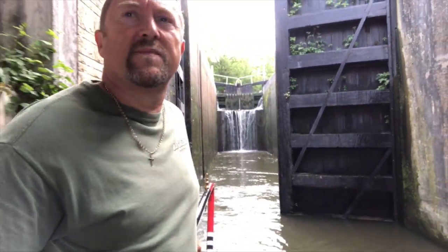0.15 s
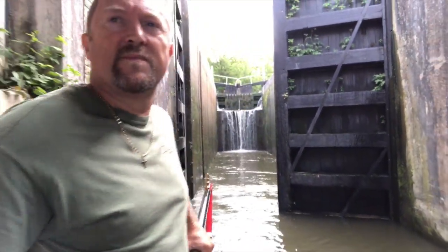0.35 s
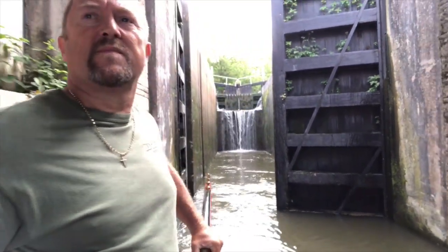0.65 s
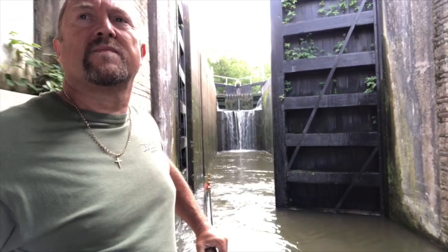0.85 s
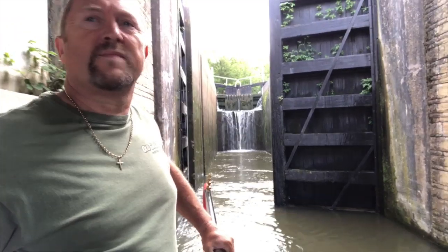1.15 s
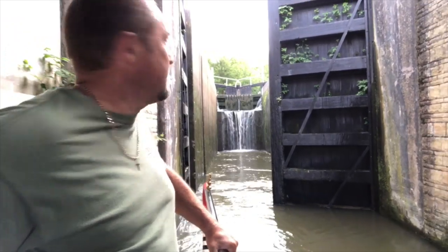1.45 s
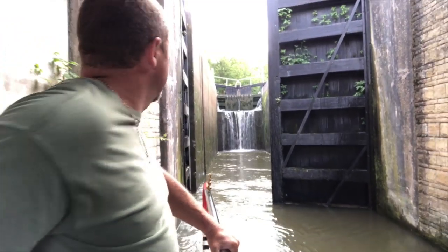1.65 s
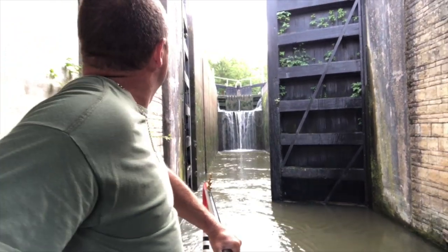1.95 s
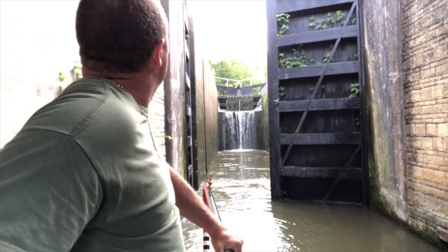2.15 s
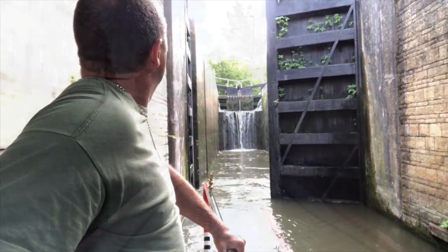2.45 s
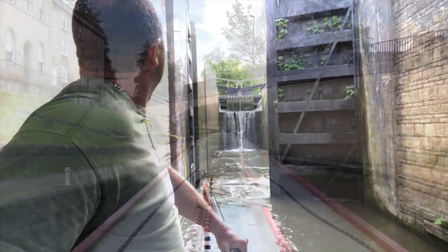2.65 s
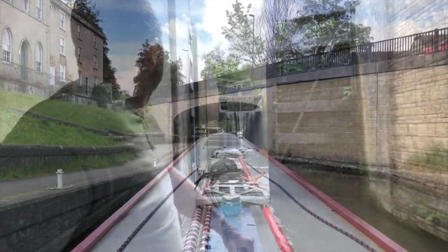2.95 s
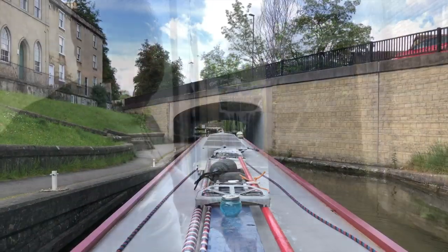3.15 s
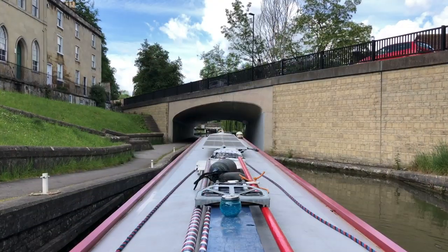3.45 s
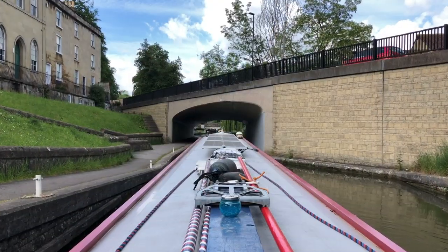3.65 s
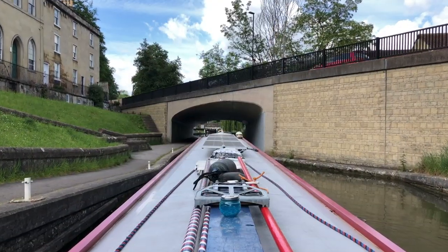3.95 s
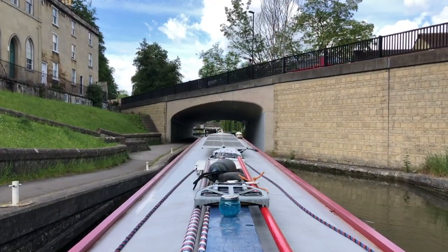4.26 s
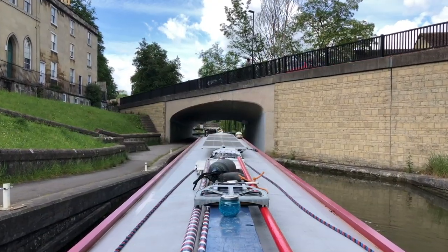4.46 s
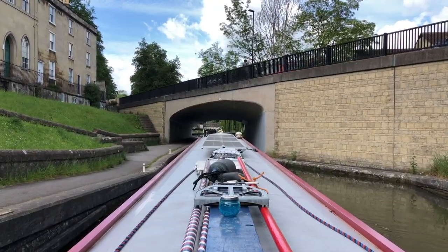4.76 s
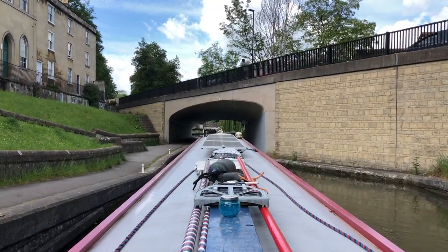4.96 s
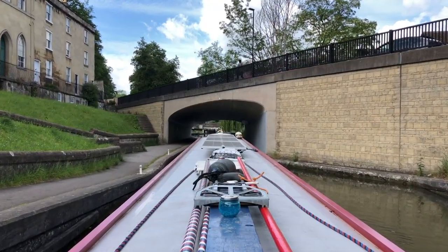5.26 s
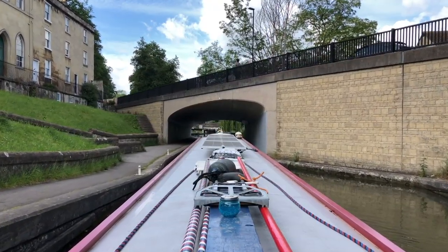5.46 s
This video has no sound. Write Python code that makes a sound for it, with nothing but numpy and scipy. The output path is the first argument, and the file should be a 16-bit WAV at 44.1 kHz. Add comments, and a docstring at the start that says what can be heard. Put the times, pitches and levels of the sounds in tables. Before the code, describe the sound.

Heard from a narrowboat in a deep lock, a low, booming engine drone sits under the steady splash and hiss of water falling through the gates. The boom swells a little, then the lock blends into open canal and the hiss drops away. The diesel keeps an even chug, humming through the hull with ticking valves and brief fits of metallic rattling over a gentle wash of water.

```python
"""In a deep canal lock, a narrowboat's diesel engine ticks over. Its exhaust pulses make low notes that
boom between the walls, while water pours from the leaking gates, trapping bubbles and throwing spray.
About halfway, the lock fades into the open canal. There the same engine chugs, shakes the steel hull,
clatters its valves and rattles its loose covers, over the soft wash of the propeller's wake."""
import sys
import numpy as np
from scipy import signal
from scipy.fft import rfft, irfft, next_fast_len
from scipy.io import wavfile
from scipy.ndimage import uniform_filter1d, map_coordinates

SR = 44100
rng = np.random.default_rng(int(sys.argv[2]) if len(sys.argv) > 2 else 0)


def unload_audio(sound):
    """Save the sound as a 16-bit wav file, at the path given as the first command line argument."""
    columns = np.transpose(np.atleast_2d(sound))
    # keep every value between -1 and 1, then stretch to whole-number steps
    steps = np.round(np.clip(columns, -1, 1) * 32767)
    wavfile.write(sys.argv[1], SR, steps.astype(np.int16))


N = 247401

# How fast the engine fires, a touch slower on the canal: (time [s], firing rate [Hz])
ENGINE_SPEED = [(0, 28.23), (3.2, 28.29), (3.6, 28.19)]
# The tone of these four noises, from bass to treble: (frequency [Hz], relative level [dB])
PLUNGE_TONE = [(20, -25), (60, 4.5), (130, -1), (195, 4), (245, -3), (295, 0), (350, -5), (520, -2.5),
               (750, -4.5), (1100, -4), (1550, -7), (2000, -10), (4000, -17.5), (9000, -37)]
WASH_TONE = [(20, -14), (100, -18), (400, 0), (720, -2), (980, -3.5), (1400, -7.5), (1900, -13.5),
             (2600, -12.5), (3300, -18), (5000, -24), (6300, -24.5), (9000, -37), (15500, -60)]
HULL_TONE = [(40, -1), (110, 1.5), (190, -1.5), (250, 2.5), (305, 0), (360, -18), (600, -16), (1500, -56.5)]
CLATTER_TONE = [(400, -16), (950, 3), (1500, -4), (2000, -4), (2700, -15), (3200, -11.5), (4300, -10.5),
                (5000, -16), (6500, -20), (9000, -21.5), (15500, -40)]
# Tone of the spray's hiss as heard, with the treble above 8 kHz turned down a step:
# (frequency [Hz], relative level [dB])
HEARD_SPRAY_TONE = [(400, -37), (1400, 2), (2600, 0.5), (4800, 0.5), (7000, -2.5), (8000, -3), (8300, -6.5),
                    (11000, -9), (14000, -12), (16000, -15)]
# Gulps of water through the gates: (time [s], boost [dB])
GATE_GULPS = [(0.15, 1.5), (0.67, 1.0), (1.04, 1.5), (2.1, 0.6), (2.6, 1.2)]
# Strong exhaust notes and their echo off the walls:
# (pitch [x firing rate], level before echo [dB], echo strength [0-1], time the echo is in step [s])
LOCK_EXHAUST = [(2, -34.5, 0.8, 0.18), (4, -45, .5, 1.7), (5, -38, 0.24, 3.1)]
CANAL_EXHAUST = [(2, -25.5, .06, 5.3), (3, -26.5, 0.25, 4.42), (4, -38, 0.57, 3.86), (5, -33, 0.091, 3.6)]
# Weaker exhaust notes: (pitch [x firing rate], level in the lock [dB], level on the canal [dB])
WEAK_NOTES = [(1, -52, -46), (6, -47, -43), (7, -52.5, -52.5), (9, -56, -51), (11, -50, -53.5),
              (18, -69, -57.5)]
# How the boom in the lock swells: (time [s], base level [dB])
BOOM_SWELL = [(0.08, -14.5), (0.78, -13), (1.01, -14.5), (2.37, -10.5), (2.6, -11)]
# Where the hollow engine bay and the covers ring: (frequency [Hz], width [Hz], relative level [dB])
BAY_RINGS = [(251, 32, 5.5), (309, 49, 4.5), (930, 85, 2), (1040, 110, -12.5)]
COVER_RINGS = [(2235, 70, -8), (2635, 80, 0), (2850, 60, -3), (4250, 300, -12), (5500, 400, -11)]
# Fits of harder chatter from the covers: (start [s], length [s], boost [dB])
CHATTER_FITS = [(3.32, 0.09, 3.5), (3.545, .04, 7.5), (3.64, .42, 4), (5.172, 0.044, 6.5)]

PLUNGE_DB, SPRAY_DB, CLATTER_DB, COVER_DB = -28, -33.5, -45.5, -54.5  # base levels
TIME = np.arange(N) / SR  # seconds at each sample


def amp(db):
    """Turn decibels into a number to multiply a sound by."""
    return 10 ** (np.asarray(db) / 20)


def unit(x):
    """Scale x to an average strength (rms) of 1."""
    return x / np.sqrt(np.mean(x ** 2) + 1e-20)


def curve(rows):
    """Join (time, value) points with straight lines."""
    return np.interp(TIME, *np.transpose(rows))


def wobble(rate):
    """A smooth curve through rate random points a second."""
    return map_coordinates(rng.standard_normal(int(N * rate / SR) + 4), [TIME * rate])


def ramp(start_s, length_s):
    """A smooth rise from 0 to 1."""
    return np.sin(np.pi / 2 * np.clip((TIME - start_s) / length_s, 0, 1)) ** 2


def filtered(x, response):
    """Turn each frequency f in x up or down by response(f)."""
    size = next_fast_len(N + SR // 2)
    return irfft(rfft(x, size) * response(np.fft.rfftfreq(size, 1 / SR)), size)[:N]


def coloured(x, tone):
    """Shape x with a tone table, at strength 1."""
    hz, db = np.transpose(tone)
    return unit(filtered(x, lambda f: amp(np.interp(np.log(f + 1), np.log(hz), db))))


def resonant(x, rings):
    """Make x ring at the given frequencies, at strength 1."""
    def response(f):
        return sum(amp(db) * 1j * f * width / (hz * hz - f * f + 1j * f * width)
                   for hz, width, db in rings)
    return unit(filtered(x, response))


def churn(patchy_db):
    """Churning water: a hiss with random loud and soft patches in time and pitch."""
    spectrum = signal.stft(rng.standard_normal(N), nperseg=512)[2]
    patches = uniform_filter1d(rng.standard_normal(spectrum.shape), size=7, axis=0)
    patches = unit(uniform_filter1d(patches, size=7, axis=1))
    return unit(signal.istft(spectrum * amp(patchy_db * patches), nperseg=512)[1][:N])


def bubbles(count, low_hz, high_hz, cycles, spread_db, rise):
    """Bubbles ring for a few cycles each and climb in pitch as they near the surface."""
    when, pitch, strength = rng.random((count, 3)).T[:, :, None]
    hz = low_hz * (high_hz / low_hz) ** pitch
    samples = np.arange(SR // 60)
    age = hz * samples / SR / cycles  # at 1 the bubble has nearly died away
    ring = np.sin(2 * np.pi * cycles * age * (1 + rise * np.minimum(age, 1))) * np.exp(-np.pi * age)
    loudness = amp(-spread_db * np.log(np.maximum(strength, .01)))
    positions = (when * N).astype(int) + samples
    return unit(np.bincount(positions.ravel(), (loudness * ring).ravel(), N)[:N])


def leaking_gates(gulp_s=0.05, fade_db_per_s=0.23):
    """Falling water traps bubbles and throws spray. The plunge fades a little as the boat draws away."""
    gulps_db = sum(db * np.exp(-((TIME - at_s) / gulp_s) ** 2) for at_s, db in GATE_GULPS)
    gurgle = bubbles(count=3500, low_hz=298.3, high_hz=3940, cycles=14, spread_db=0.5, rise=0.15)
    plunge = coloured(churn(patchy_db=0.3) + amp(-16) * gurgle, PLUNGE_TONE)
    plunge *= amp(PLUNGE_DB + gulps_db - fade_db_per_s * TIME + 0.32 * wobble(14))
    droplets = bubbles(count=4000, low_hz=1900, high_hz=13200, cycles=2.2, spread_db=2.5, rise=0.042)
    spray = coloured(churn(patchy_db=0.85) + amp(-15.5) * droplets, HEARD_SPRAY_TONE)
    spray *= amp(SPRAY_DB + 0.28 * wobble(24.46))
    return amp(0.2 * wobble(3.65)) * (plunge + spray)


def count_firings(first_s=0.014):
    """How many times the engine has fired so far. Its speed control wanders a little."""
    rate_hz = curve(ENGINE_SPEED)
    firings = np.cumsum(rate_hz * (1 + 0.0007 * wobble(4.98))) / SR
    return firings - first_s * rate_hz[0] + 0.0022 * wobble(28)


def exhaust(firings, strong_notes, weak_notes, swell_s, rough_db, uneven_db):
    """Exhaust pulses make notes. As the boat creeps on, their echo drifts into step every swell_s."""
    def note(multiple, db, pipe_hz=117, pipe_width_hz=12):
        hz = multiple * ENGINE_SPEED[0][1]
        # the pipe holds back notes near the pitch it rings at
        lag = 2 * np.arctan2(hz * pipe_width_hz, pipe_hz ** 2 - hz ** 2)
        return np.sqrt(2) * amp(db) * np.cos(2 * np.pi * multiple * firings - lag)

    drone = np.zeros(N)
    for multiple, db, echo, in_step_s in strong_notes:
        swell = np.abs(1 + echo * np.exp(2j * np.pi * (TIME - in_step_s) / swell_s))
        flutter_db = rough_db * multiple * wobble(22.07)  # higher notes vary more
        drone += note(multiple, db + flutter_db) * swell
    return drone + sum(note(multiple, db + uneven_db * wobble(17)) for multiple, db in weak_notes)


def lock_boom(firings, multiple=3):
    """The lock's walls hold one exhaust note and swell it far above the rest."""
    level_db = curve(BOOM_SWELL) - 0.3 + 0.22 * wobble(22.1)
    return np.sqrt(2) * amp(level_db) * np.cos(2 * np.pi * multiple * firings)


def wash():
    """The propeller's wake rushes along the hull with a fizz of small bubbles."""
    fizz = bubbles(count=3000, low_hz=1175, high_hz=12000, cycles=3.9, spread_db=0, rise=0.12)
    return amp(-38 + 0.12 * wobble(7.8)) * coloured(churn(patchy_db=1) + amp(-14) * fizz, WASH_TONE)


def throb(cycles, lag, sharpness):
    """One swell in each cycle; lag (0-1) says how far into the cycle it peaks."""
    return unit(np.exp(sharpness * np.cos(2 * np.pi * (cycles - lag))))


def engine_body(firings, loudest_s=3.5, ease_db_per_s=1.0):
    """Pistons shake the hull, fuel injectors and valves clatter after each firing, and the bay rings."""
    hull = coloured(rng.standard_normal(N), HULL_TONE) * throb(2 * firings, lag=0.6, sharpness=0.12)
    hull *= amp(-35.5 + 0.58 * wobble(8))
    bay = amp(-41.8) * resonant(rng.standard_normal(N), BAY_RINGS)
    clatter = coloured(rng.standard_normal(N), CLATTER_TONE) * throb(firings, lag=0.27, sharpness=0.3)
    clatter *= amp(CLATTER_DB + 0.43 * wobble(28))
    easing = amp(-ease_db_per_s * np.abs(TIME - loudest_s))  # builds, then eases as the boat gets going
    return hull + easing * (bay + clatter)


def loose_covers(firings, edge_s=0.011):
    """Each cover chinks once a firing, with uneven strength. Now and then they all chatter harder."""
    fits_db = sum(db * (ramp(start, edge_s) - ramp(start + length, edge_s))
                  for start, length, db in CHATTER_FITS)
    ringing = np.zeros(N)
    for hz, width, db in COVER_RINGS:
        chinks = rng.standard_normal(N) * throb(firings, lag=0.22, sharpness=1.05) * amp(2 * wobble(28))
        ringing += amp(db) * resonant(chinks, [(hz, width, 0)])
    return amp(COVER_DB + fits_db) * ringing


def scene():
    """The lock fades out as the open canal fades in, with one engine beat running through both."""
    firings = count_firings()
    lock_weak = [(multiple, db) for multiple, db, _ in WEAK_NOTES]
    canal_weak = [(multiple, db) for multiple, _, db in WEAK_NOTES]
    lock_exhaust = exhaust(firings, LOCK_EXHAUST, lock_weak, swell_s=3.83, rough_db=0.07, uneven_db=0)
    canal_exhaust = exhaust(firings, CANAL_EXHAUST, canal_weak, swell_s=2.74, rough_db=0.18, uneven_db=1.5)
    lock = leaking_gates() + lock_exhaust + lock_boom(firings)
    canal = wash() + engine_body(firings) + loose_covers(firings) + canal_exhaust
    canal_share = ramp(start_s=2.49, length_s=0.97)
    return ((1 - canal_share) * lock + canal_share * canal)[None]


def record(dry, top_hz=15800):
    """Cut away the very highest treble."""
    return filtered(dry[0], lambda hz: hz < top_hz)[None]


dry = scene()
out = record(dry)
unload_audio(out)
```